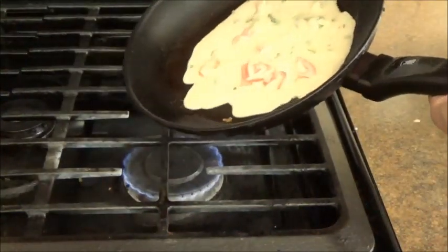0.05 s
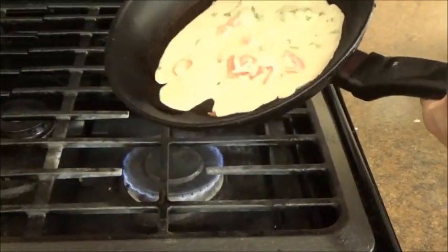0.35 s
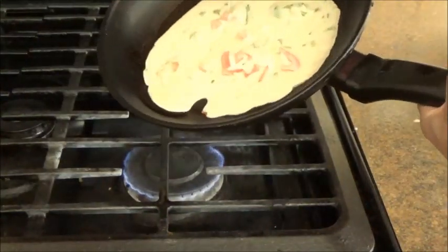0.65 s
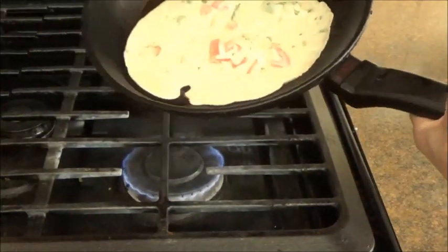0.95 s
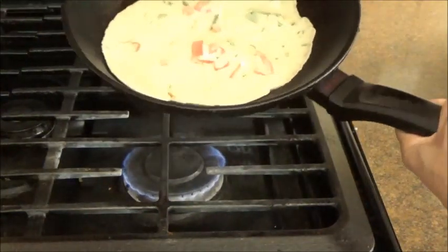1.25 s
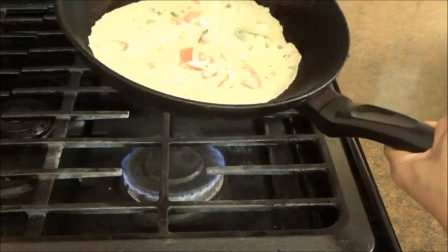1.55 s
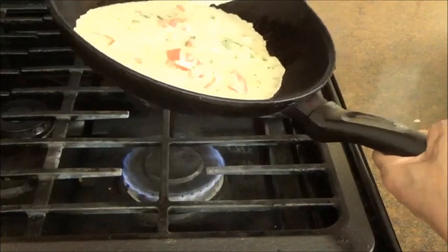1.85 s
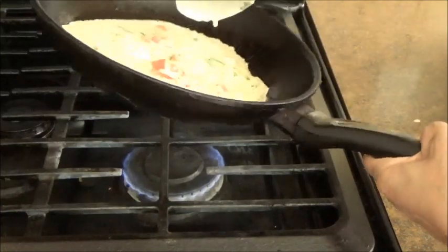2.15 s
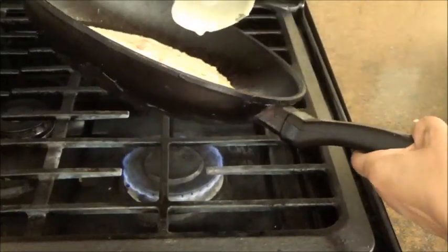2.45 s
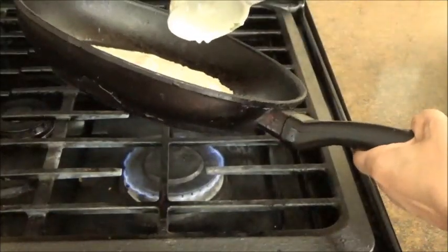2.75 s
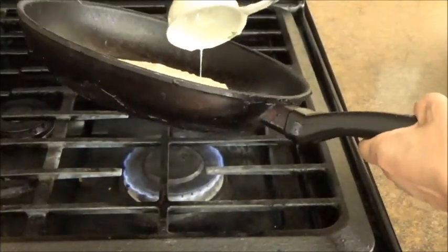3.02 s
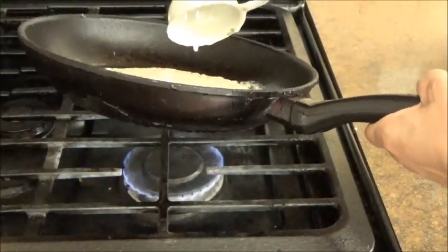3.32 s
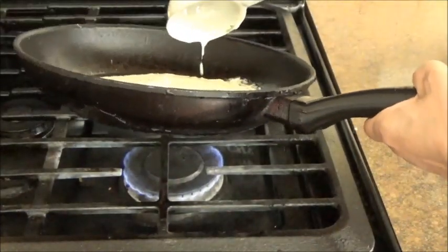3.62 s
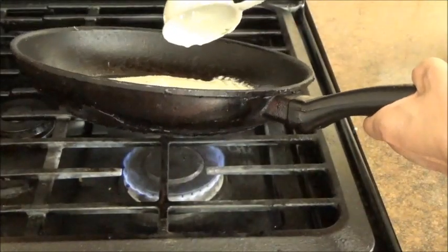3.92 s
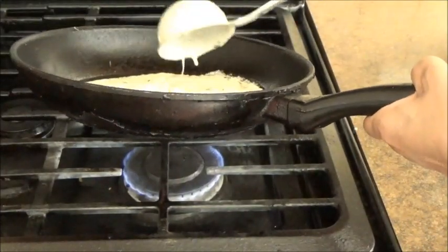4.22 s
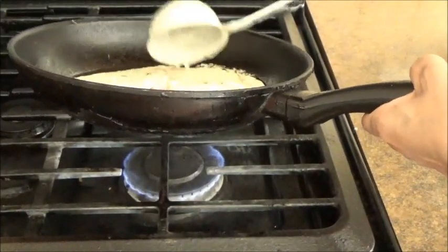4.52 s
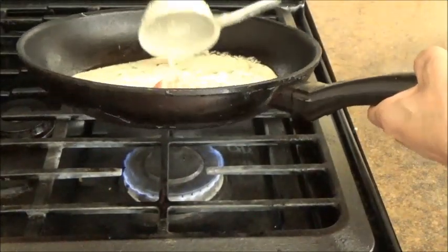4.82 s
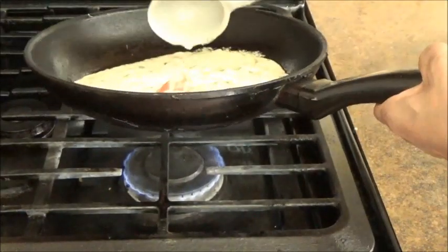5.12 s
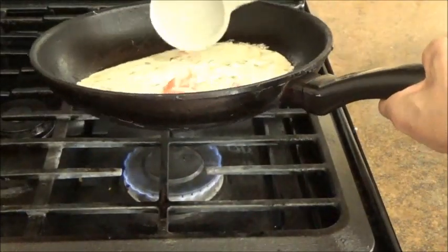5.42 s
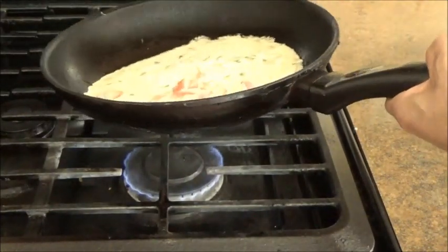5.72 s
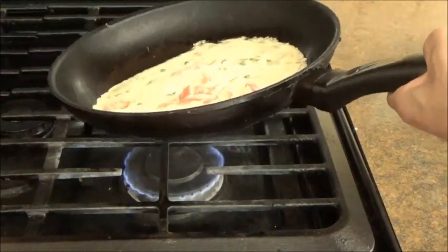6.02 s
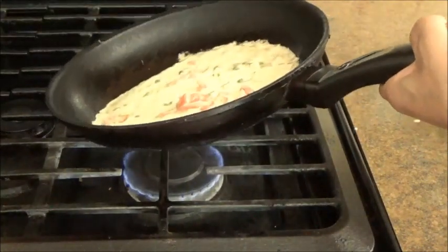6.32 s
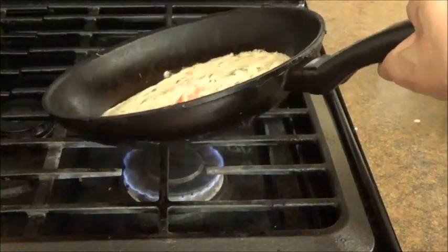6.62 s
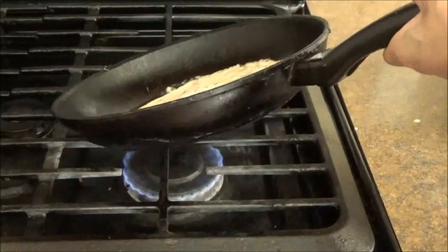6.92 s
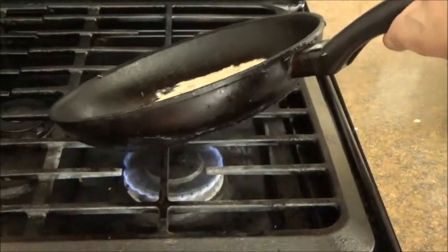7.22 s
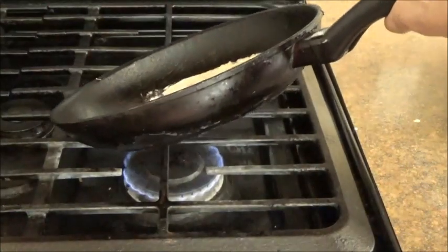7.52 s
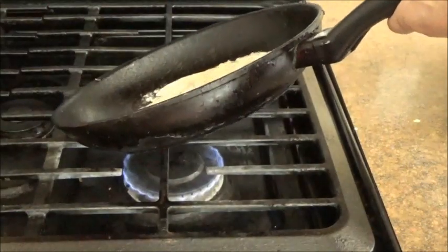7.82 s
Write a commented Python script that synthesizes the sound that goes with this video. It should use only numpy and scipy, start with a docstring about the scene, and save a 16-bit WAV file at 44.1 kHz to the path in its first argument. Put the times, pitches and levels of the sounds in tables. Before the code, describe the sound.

Batter sizzles in a frying pan close to the microphone, loud and dense from the start, a bright hiss with a slight metallic ring. From about 1.5 seconds it eases, with a few short spurts of steam between 2.3 and 3 seconds. From 3 seconds on it thins to a softer crackle, and single bubbles stand out as sharp, irregular ticks and wet little pops. The sizzle is at its softest from about 4.5 to 7 seconds. At 7 seconds something gives one dull knock, a little farther off, with a short room echo. The sizzle then swells again moderately until the end at about 8 seconds. Underneath, all the way through, are the faint steady rush of a gas flame and a faint low appliance hum that slowly swells and fades in the kitchen.

```python
"""Batter sizzling in a pan

A frying pan is tilted round over a gas burner in a kitchen. Steam bubbles burst in a dense hiss that
thins to a crackle with single pops, and swells again as the batter reaches hot metal. The bursts make
the pan ring. The flame rushes, an appliance hums in slow swells, and near the end something knocks dully."""
import sys
import numpy as np
from scipy import signal
from scipy.fft import rfft, irfft
from scipy.io import wavfile

SR = 44100
rng = np.random.default_rng(int(sys.argv[2]) if len(sys.argv) > 2 else 0)


def to_wav(s):
    """Save 16-bit WAV."""
    ch = np.atleast_2d(s).T  # columns
    pcm = np.round(np.clip(ch, -1, 1) * 32767)  # PCM
    wavfile.write(sys.argv[1], SR, pcm.astype(np.int16))


N = 351036

# How hard the batter boils. Each row: time in seconds, level in dB.
BOIL_CURVE = [(0.0, -42), (0.4, -41), (0.95, -43.5), (1.57, -45), (2.1, -50), (2.7, -50), (3.41, -54),
              (4.48, -57.5), (5.0, -58.5), (5.98, -55.5), (6.42, -58.5), (6.94, -57), (7.96, -50)]
# The tone of large, medium and small bubbles. Each row: frequency in Hz, level in dB.
LARGE_TONE = [(150, -30), (500, -14), (950, -9), (1280, -2.5), (1800, -1.5), (2550, -2), (3500, -0.5),
              (4600, -2), (8000, -22)]
MEDIUM_TONE = [(1500, -42), (3200, -10), (4300, -1.5), (5300, 3), (6000, 3), (6800, -2.5), (8000, -3),
               (11000, -23.5)]
SMALL_TONE = [(4000, -48), (6500, -0.5), (7500, 2.5), (8200, 6), (9000, 2.5), (10000, 3.5), (10600, -2.5),
              (11300, -12.5)]
# The pan's ringing notes. Each row: pitch in Hz, width in Hz, level in dB, share from the wall (0 to 1).
PAN_NOTES = [(1290, 49, -5.5, 0), (1773, 110, -5, 0), (3150, 120, 2.5, 0.96), (3770, 55, -1, 0.6),
             (4570, 71, 1.5, 0.84), (4740, 55, 3, 0.8), (5320, 48, 1, 0.1), (6550, 60, -2, 1),
             (6990, 54, 3.5, 0), (8340, 45, 5.5, 0.96), (9012, 30, -1, 1)]
# When the tilt runs batter up the pan's wall. Each row: start in seconds, end in seconds.
BATTER_ON_WALL = [(0.0, 0.3), (7.13, 7.96)]
# The tone of the gas flame. Each row: frequency in Hz, level in dB.
FLAME_TONE = [(25, -28), (60, -19.5), (115, -8.5), (145, -14), (205, -2), (260, -1), (330, 4), (380, 2),
              (425, 2.5), (550, -2), (800, 2), (1300, 0.5), (3000, -11.5), (9000, -20)]
# How the hum's main note swells and fades. Each row: time in seconds, level change in dB.
HUM_SWELLS = [(0.12, -3), (0.36, -22), (0.95, 0), (1.25, -1), (1.62, -9), (2.05, -1), (2.5, 0), (2.82, -16),
              (3.25, -4), (3.7, -2), (3.98, -17), (4.3, -2), (4.6, -2), (4.8, -10), (5.25, -10), (5.5, -2),
              (5.85, -2), (6.1, -8), (7.37, -11), (7.55, -1), (7.96, -4)]
# The hum's weaker notes. Each row: pitch in Hz, level in dB.
WEAK_HUM_NOTES = [(179, -80), (323, -70.5), (346, -71), (415, -72.5), (431, -70)]
# Single loud bubbles. Each row: start in seconds, level in dB, pitch in Hz, wetness (0 to 1).
LOUD_POPS = [(0.061, -15, 5400, .1), (2.967, -17.5, 5700, .85), (3.010, -20, 6300, .4),
             (3.161, -23, 5300, .75), (3.254, -25, 5100, .1), (3.395, -23, 5900, .55),
             (3.465, -24, 5050, .6), (3.601, -25, 5200, .4), (3.699, -22, 6900, .55),
             (3.880, -27, 3200, .4), (3.925, -21.5, 6000, .4), (3.967, -22, 6400, 1),
             (4.078, -21.5, 3800, .25), (4.112, -23, 6300, .5), (4.162, -27, 2700, .1),
             (4.416, -20.5, 4700, .05), (4.609, -17.5, 7500, .1), (4.731, -22.5, 6300, .9),
             (4.970, -21, 8600, .4), (5.009, -21.5, 6300, .05), (5.163, -20.5, 6400, .05),
             (5.390, -20, 2800, .2), (5.591, -19.5, 7600, .65), (5.631, -20, 5900, .3),
             (5.807, -24, 5300, .1), (5.876, -18.5, 6900, .1), (6.014, -24, 5900, .7),
             (6.199, -22, 5300, .45), (6.246, -20, 4700, .15), (6.298, -24.5, 5500, .15),
             (6.517, -22, 5900, .3), (6.670, -19.5, 6400, .4), (6.726, -19.5, 7900, .45),
             (7.255, -22.5, 5600, .35), (7.339, -18.5, 5900, .55), (7.367, -23, 4800, .7),
             (7.453, -22.5, 4500, .6), (7.575, -21, 6400, .1), (7.665, -17.5, 8400, 1),
             (7.913, -20, 6600, .55)]
# Fresh batter meets hot metal. Each row: start in seconds, level in dB, pitch in Hz, seconds to fade 60 dB.
BATTER_FLARES = [(1.0, -37.5, 8430, 6.4), (2.27, -39.5, 5930, 7.7), (2.36, -45, 8400, 7.6),
                 (3.118, -37, 5180, 0.49), (3.92, -44.5, 8540, 1.3), (7.02, -45.5, 8140, 3.3),
                 (7.13, -46.5, 4900, 2)]
# Spurts of steam. Each row: start in seconds, length in seconds, level in dB, pitch in Hz.
STEAM_SPURTS = [(2.32, .05, -40.5, 4800), (2.374, 0.053, -40, 5900), (2.655, .04, -40, 5900),
                (2.732, 0.076, -41, 5700), (2.97, 0.047, -42, 5400), (3.653, 0.063, -43, 5900),
                (4.0, 0.21, -47.5, 8050), (6.026, 0.045, -46, 7250), (7.128, .025, -46, 4700),
                (7.2, 0.084, -42, 5900)]
# The knock and its rebounds. Each row: start in seconds, level in dB.
KNOCK_BLOWS = [(6.985, -34), (7.011, -49), (7.057, -61)]
# The knocked thing's clear notes. Each row: pitch in Hz, level in dB, seconds to fade 60 dB.
KNOCK_NOTES = [(177, -8, 0.27), (268, -8, 0.19), (398, -12.5, 0.98), (453, -5, 0.35), (488, 3, 0.097),
               (613, -13, 0.33), (720, -7, 0.3), (777, 5.5, 0.056), (784, -16, 0.32), (834, -11, 0.35),
               (962, -8, 0.38), (1130, -13, 1), (1242, -8, 0.6), (1600, -9, 0.23), (1800, -10.5, 0.26)]
# Its many other notes, which blur into a thud. Each row: frequency in Hz, level in dB.
THUD_TONE = [(80, -35), (160, -24), (280, -1), (520, 0.5), (800, 3.5), (1250, -7), (1450, -10), (1850, -12),
             (3000, -18), (6000, -69)]
# The kitchen's echo. Each row: lowest and highest frequency in Hz, seconds to fade 60 dB.
KITCHEN_ECHO = [(60, 2700, 0.74), (1480, 3400, 0.26), (5250, 16000, 0.16)]


def from_db(db):
    """Turn decibels into a number to multiply by."""
    return 10 ** (np.asarray(db) / 20)


def unit_power(x):
    """Scale a sound to an average power of 1."""
    return x / np.sqrt(np.mean(x ** 2) + 1e-20)


def curve(rows):
    """Join (seconds, value) points with straight lines, one value per sample."""
    return np.interp(np.arange(N) / SR, *np.transpose(rows))


def drift(rate):
    """A smooth random wobble of size about 1 that changes about `rate` times a second."""
    r = np.exp(-80 * np.pi * rate / SR)
    slow = signal.lfilter([1], [1, -2 * r, r * r], rng.standard_normal(N // 40 + 2002))[2000:]
    return np.interp(np.arange(N) / 40, np.arange(len(slow)), unit_power(slow))


def coloured(x, tone):
    """Shape a sound with a tone table, at power 1; nothing rings ahead of a click (minimum phase)."""
    size = 8192
    hz, db = np.transpose(tone)
    grid_hz = np.arange(size // 2 + 1) * SR / size
    log_gain = np.log(from_db(np.interp(np.log(grid_hz + 1), np.log(hz), db)))
    cepstrum = irfft(log_gain)[:size // 2]
    response = irfft(np.exp(rfft(np.r_[cepstrum[0], 2 * cepstrum[1:]], size)))
    return unit_power(signal.fftconvolve(x, response)[:N])


def resonate(x, hz, width_hz):
    """Keep the sound near one pitch; the narrower the width, the longer it rings."""
    r = np.exp(-np.pi * width_hz / SR)
    feedback = [1, -2 * r * np.cos(2 * np.pi * hz / SR), r * r]
    return signal.lfilter(np.array([1, 0, -1]) * (1 - r * r) / 2, feedback, x)


def clicks(per_s, spread_db, clump_db):
    """Random clicks of uneven size that come in clumps, at power 1."""
    happens = rng.random(N) < per_s * from_db(clump_db * drift(25)) / SR
    sizes = from_db(spread_db * np.minimum(rng.exponential(1, N), 5)) * rng.choice([-1, 1], N)
    return unit_power(happens * sizes / np.sqrt(np.minimum(per_s, SR)))


def boil():
    """How far the boil is above its average, in dB."""
    db = curve(BOIL_CURVE)
    return db - db.mean()


def sizzle():
    """Steam bubbles of three sizes burst; a harder boil makes them louder and more frequent."""
    boil_db = boil()
    per_s = 3000 * from_db(1.3 * (boil_db - boil_db.min()))
    large = coloured(clicks(per_s, spread_db=3.0, clump_db=1.9), LARGE_TONE)
    medium = coloured(clicks(per_s, spread_db=3.5, clump_db=2.0), MEDIUM_TONE)
    small = coloured(clicks(per_s, spread_db=4.0, clump_db=2.5), SMALL_TONE)
    return (from_db(-45 + 0.93 * boil_db) * large
            + from_db(-42 + 0.81 * boil_db) * medium
            + from_db(-47.5 + 0.83 * boil_db) * small)


def pan_ring(frying, wall_dry_db=-13, wall_wet_db=4.5, rise_s=0.045, fall_s=0.38):
    """The metal rings: the base more in a hard boil, the wall more while batter touches it."""
    t = np.arange(N) / SR
    touching = sum(np.interp(t, [on - rise_s, on, off, off + fall_s], [0, 1, 1, 0])
                   for on, off in BATTER_ON_WALL)
    wall_db = wall_dry_db + touching * (wall_wet_db - wall_dry_db)
    base_db = -6 + 0.98 * boil()
    return sum(from_db(db + base_db + wall_share * (wall_db - base_db)) * resonate(frying, hz, width_hz)
               for hz, width_hz, db, wall_share in PAN_NOTES)


def flame(level_db=-55, stereo_width=0.39):
    """Burning gas makes a steady rush."""
    middle, side = (coloured(noise, FLAME_TONE) for noise in rng.standard_normal((2, N)))
    return from_db(level_db) * (middle + stereo_width * side * np.array([[1], [-1]]))


def hum(main_hz=216.5, main_db=-60, waver_db=3.0):
    """An appliance's motor hums: one main note swells and fades among weaker ones that waver."""
    t = np.arange(N) / SR
    weak = sum(from_db(db + waver_db * drift(2.6)) * np.cos(2 * np.pi * hz * t + drift(1.96))
               for hz, db in WEAK_HUM_NOTES)
    swell = from_db(main_db + curve(HUM_SWELLS) + 1.5 * drift(10))
    main = swell * np.cos(2 * np.pi * main_hz * t + .5 * drift(6))
    return np.sqrt(2) * (main + weak)


def bubble(hz, width_hz, spray_db, fade_s):
    """One bubble bursts: a quick snap, then a short spray of droplets."""
    t = np.arange(SR // 20) / SR
    snap = resonate(resonate(1. * (t == 0), hz, width_hz), hz, 2.0 * width_hz)
    spray = resonate(resonate(rng.standard_normal(len(t)), hz, width_hz), hz, width_hz)
    return snap / abs(snap).max() + from_db(spray_db - 60 * t / fade_s) * unit_power(spray)


def pops(dry_spray_db=-25, wet_spray_db=-12, fade_s=.06):
    """Loud bubbles: a dry one ticks and taps the pan, a wet one rings longer and sprays more."""
    out = np.zeros(N + SR)
    dry_width, wet_width = 0.7, 0.19  # as shares of the pitch
    tap = from_db(-7) * bubble(hz=1900, width_hz=1600, spray_db=dry_spray_db, fade_s=fade_s)
    for start_s, db, hz, wetness in LOUD_POPS:
        width_hz = hz * dry_width * (wet_width / dry_width) ** wetness
        spray_db = dry_spray_db + wetness * (wet_spray_db - dry_spray_db)
        pop = bubble(hz, width_hz, spray_db, fade_s)
        pop += (1 - wetness) * 1900 / hz * tap  # deep pops tap hardest
        start = round(start_s * SR)
        out[start:start + len(pop)] += from_db(db) * pop
    return out[:N]


def spits(top_db=-29.5, range_db=8, low_hz=4400, high_hz=9600, count=220):
    """Smaller bubbles burst at random times and pitches, mostly faint; some ring, some only tick."""
    out = np.zeros(N + SR)
    for when, faintness, pitch, damping in rng.random((count, 4)):
        hz = low_hz * (high_hz / low_hz) ** pitch
        spit = bubble(hz, hz * (0.15 + .5 * damping ** 2), spray_db=-13 - 10 * damping, fade_s=.04)
        start = int(when * N)
        out[start:start + len(spit)] += from_db(top_db - range_db * np.sqrt(faintness)) * spit
    return out[:N]


def flares(rise_s=0.023, width_hz=1900):
    """Each patch of fresh batter fizzes around one pitch and dies down as it sets."""
    out, t = np.zeros(N), np.arange(N) / SR
    for start_s, db, hz, fade_s in BATTER_FLARES:
        age = np.maximum(t - start_s, 0)
        sputter = clicks(per_s=5000, spread_db=6.0, clump_db=5.0)
        fizz = resonate(resonate(sputter, hz, width_hz), hz, width_hz)
        out += from_db(db - 60 * age / fade_s) * (1 - np.exp(-age / rise_s)) * unit_power(fizz)
    return out


def spurts(width_hz=2800):
    """Steam escapes from under the batter in quick runs of tiny bursts that swell and stop."""
    out = np.zeros(N + SR)
    sputter = clicks(per_s=4000, spread_db=3.5, clump_db=1.0)
    for start_s, length_s, db, hz in STEAM_SPURTS:
        start, size = round(start_s * SR), round(length_s * SR)
        run = resonate(resonate(sputter[start:start + size], hz, width_hz), hz, width_hz)
        out[start:start + size] += from_db(db) * unit_power(run * signal.windows.tukey(size, .5))
    return out[:N]


def knock(thud_db=0.5, thud_fade_s=0.47, rise_s=0.0018, lowest_hz=135):
    """A dull blow with two faint rebounds: clear notes ring, and a thud builds up behind them."""
    out, t = np.zeros(N), np.arange(N) / SR
    for start_s, blow_db in KNOCK_BLOWS:
        start = round(start_s * SR)
        age = t[:N - start]
        notes = sum((-1) ** k * from_db(db - 60 * age / fade_s) * np.sin(2 * np.pi * hz * age)
                    for k, (hz, db, fade_s) in enumerate(KNOCK_NOTES))
        thud = coloured(rng.standard_normal(N), THUD_TONE)[:len(age)]
        thud *= from_db(thud_db - 60 * age / thud_fade_s) * (1 - np.exp(-age / rise_s))
        out[start:] += from_db(blow_db) * (notes + thud)
    # the knock carries no deep bass
    return signal.sosfilt(signal.butter(4, lowest_hz, "high", fs=SR, output="sos"), out)


def echo_patterns(low_hz, high_hz, fade_s):
    """Two different patterns of dying echoes, each one second long."""
    t = np.arange(SR) / SR
    band = signal.butter(2, [low_hz, high_hz], "band", fs=SR, output="sos")
    dying_noise = rng.standard_normal((2, SR)) * from_db(-60 * t / fade_s)
    return signal.sosfilt(band, dying_noise) / np.sqrt(fade_s * SR / np.log(1e6))


def echoes(x, patterns, stereo_width, turns=0):
    """A sound's echoes; a moving source cycles through the two patterns `turns` times."""
    one, other = signal.fftconvolve(x[None], patterns, axes=1)[:, :N]
    both = (one + 1j * other) * np.exp(2j * np.pi * turns * np.arange(N) / N)
    return both.real + stereo_width * both.imag * np.array([[1], [-1]])


def scene():
    """The moving pan is close, with quick echoes off the stove; the knock is farther off in the room."""
    kitchen = sum(echo_patterns(*band) for band in KITCHEN_ECHO)
    stove = echo_patterns(low_hz=476, high_hz=11900, fade_s=0.04)
    crackle = pops() + spits()
    frying = from_db(-0.92) * (sizzle() + flares() + spurts()) + crackle
    frying += from_db(-2.5) * pan_ring(frying)
    near = frying + from_db(-11.5) * echoes(frying, stove, stereo_width=0.45, turns=5.054)
    near += from_db(-14.0) * echoes(frying, kitchen, stereo_width=0.99, turns=7.02)
    blow = knock()
    far = blow + from_db(-9.0) * echoes(blow, kitchen, stereo_width=0.38)
    return (near + far + flame() + hum()) * from_db([[.15], [-.15]])  # a touch louder on the left


def record(dry):
    """Cut off the highest treble steeply."""
    cutoff_hz = 11040
    return signal.sosfilt(signal.ellip(12, .1, 80, cutoff_hz, fs=SR, output="sos"), dry)


dry = scene()
out = record(dry)
to_wav(out)
```